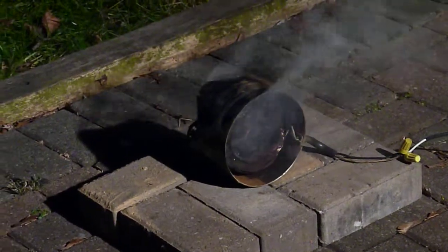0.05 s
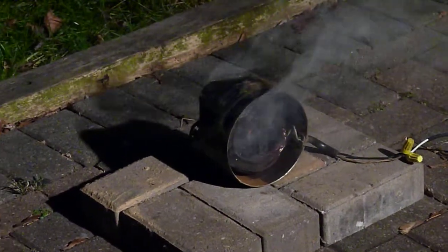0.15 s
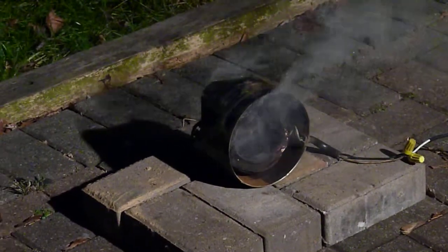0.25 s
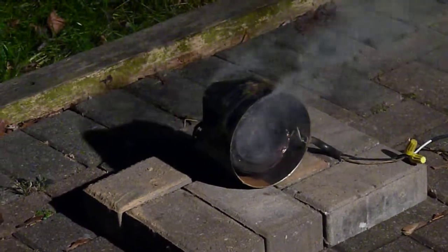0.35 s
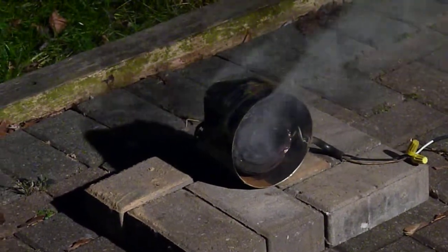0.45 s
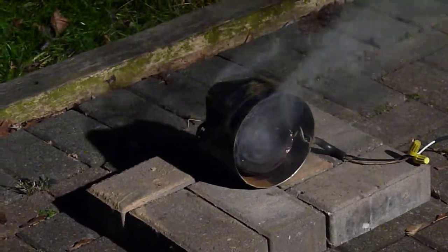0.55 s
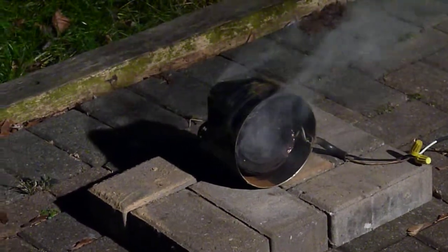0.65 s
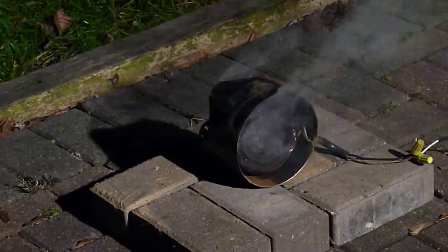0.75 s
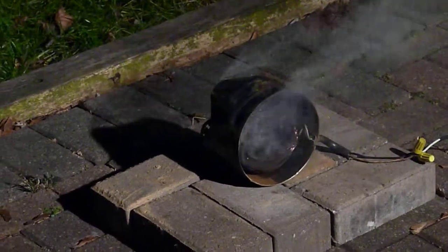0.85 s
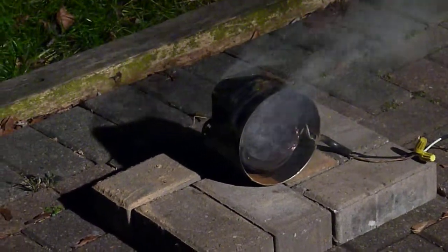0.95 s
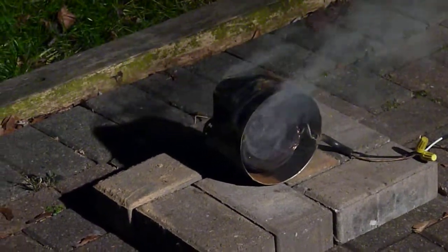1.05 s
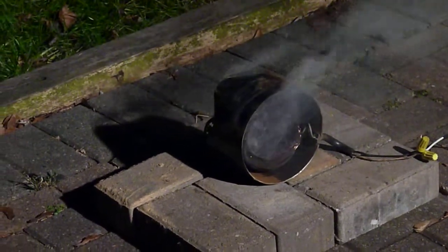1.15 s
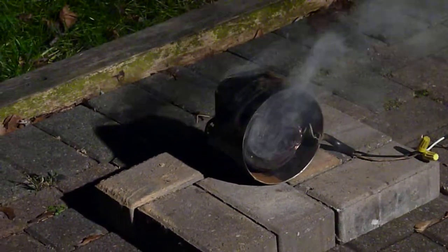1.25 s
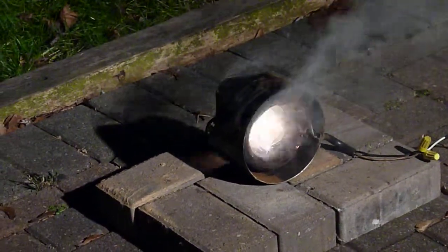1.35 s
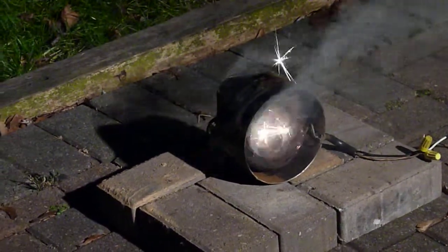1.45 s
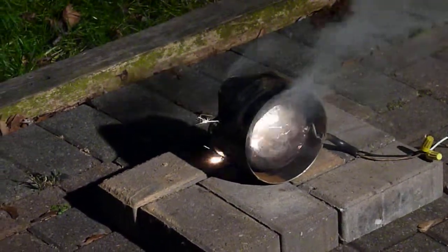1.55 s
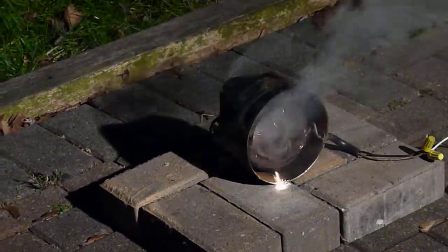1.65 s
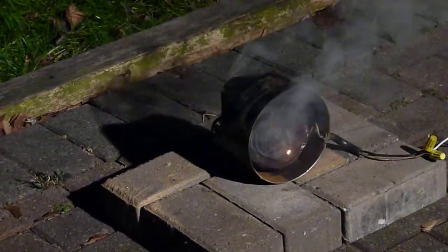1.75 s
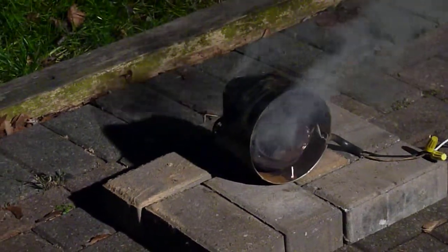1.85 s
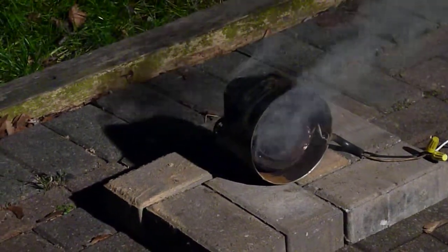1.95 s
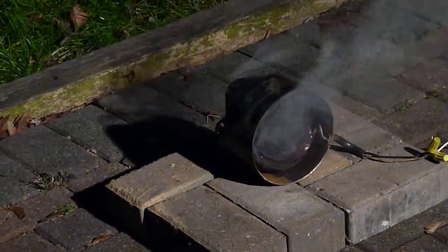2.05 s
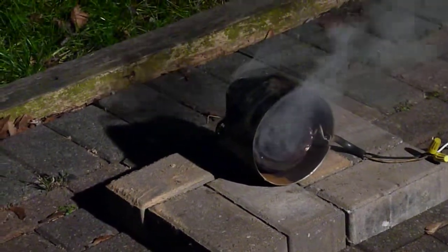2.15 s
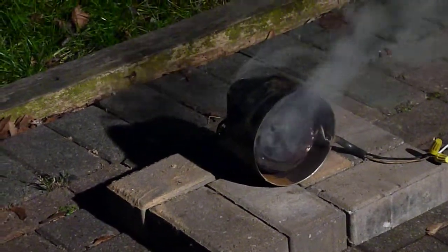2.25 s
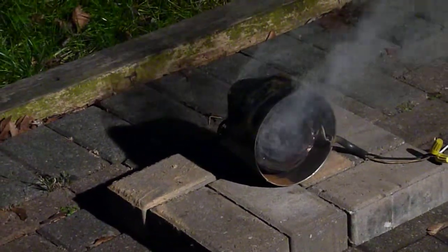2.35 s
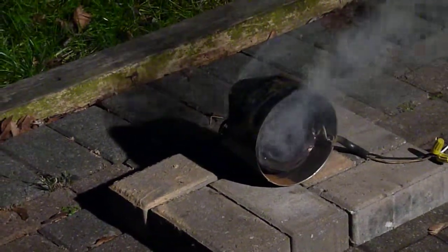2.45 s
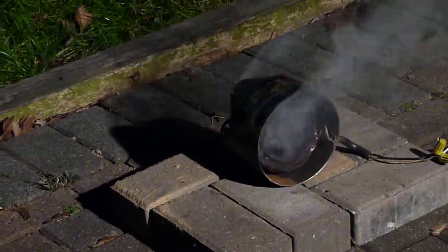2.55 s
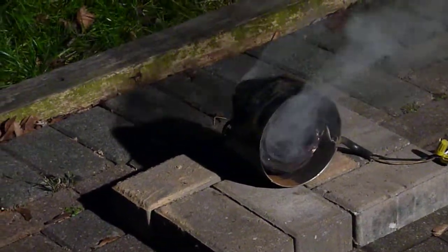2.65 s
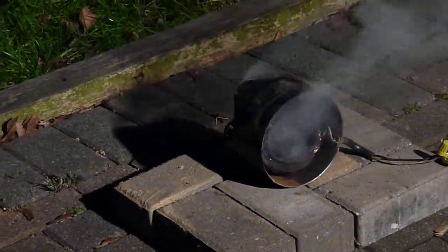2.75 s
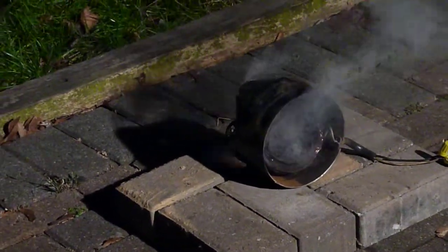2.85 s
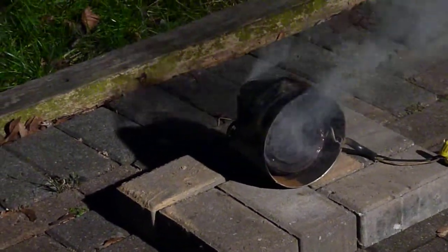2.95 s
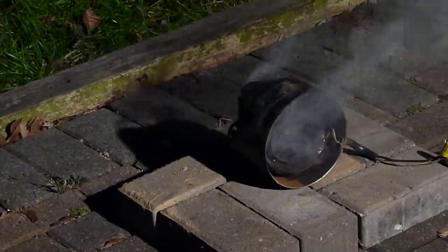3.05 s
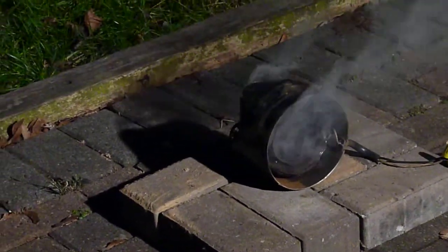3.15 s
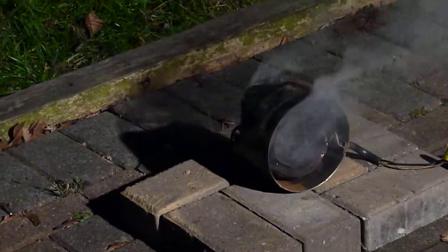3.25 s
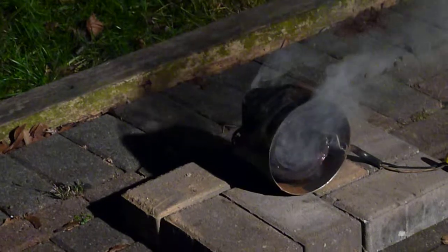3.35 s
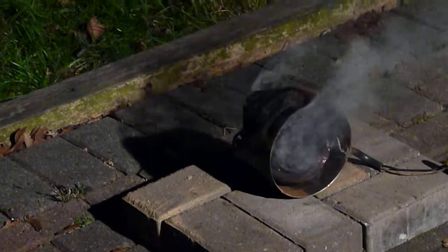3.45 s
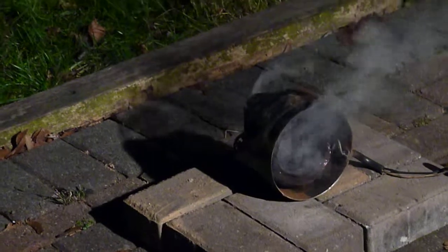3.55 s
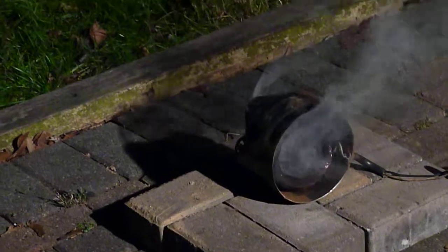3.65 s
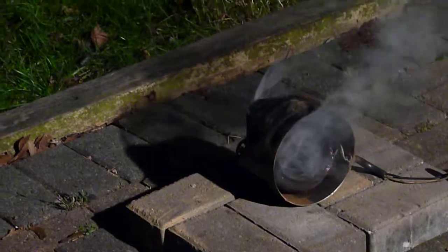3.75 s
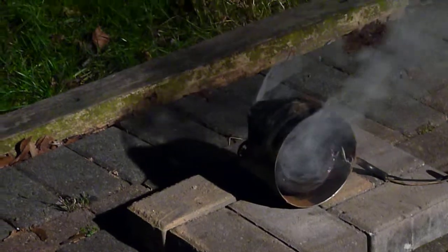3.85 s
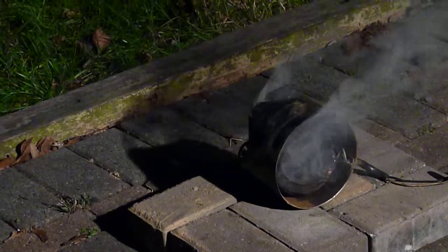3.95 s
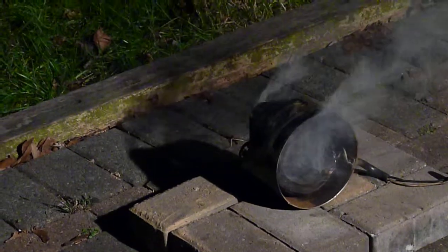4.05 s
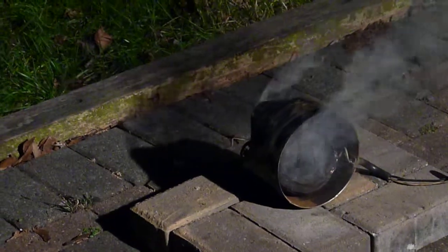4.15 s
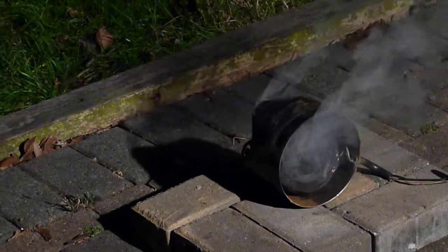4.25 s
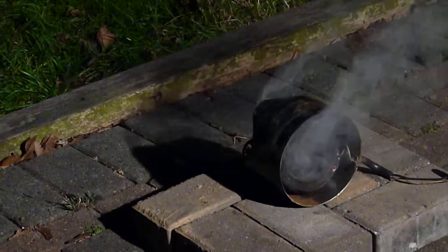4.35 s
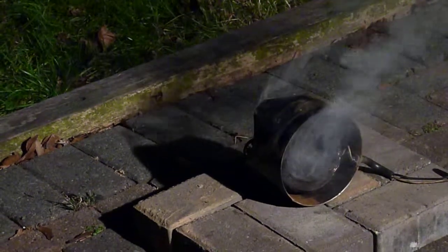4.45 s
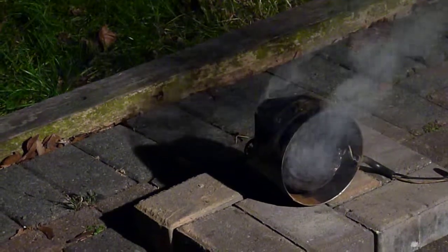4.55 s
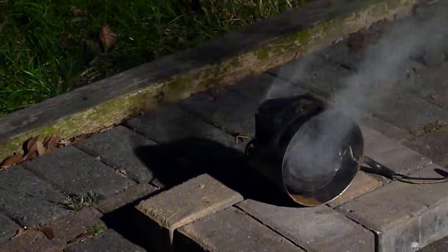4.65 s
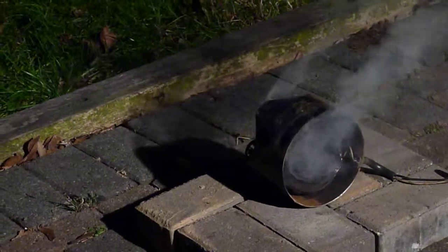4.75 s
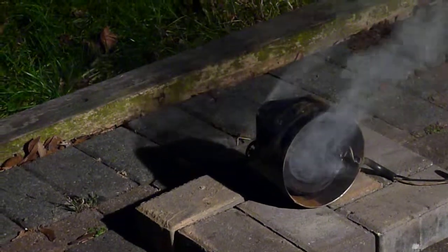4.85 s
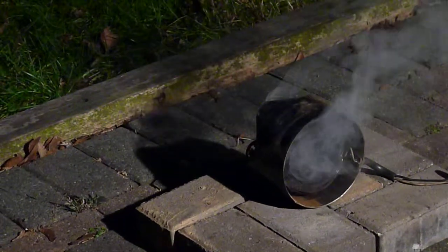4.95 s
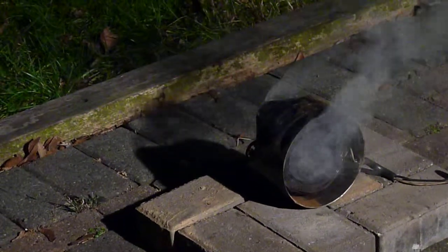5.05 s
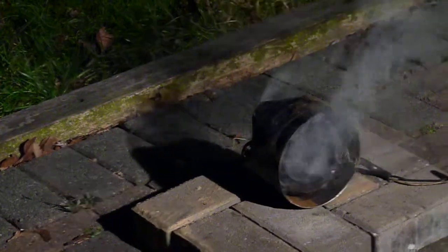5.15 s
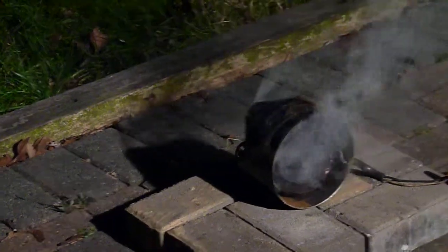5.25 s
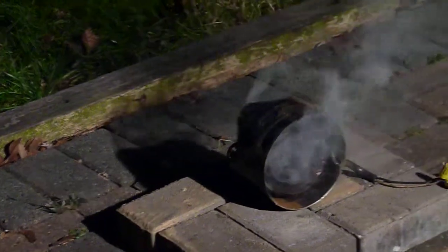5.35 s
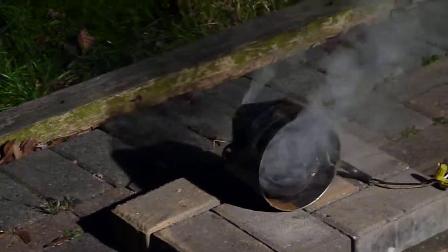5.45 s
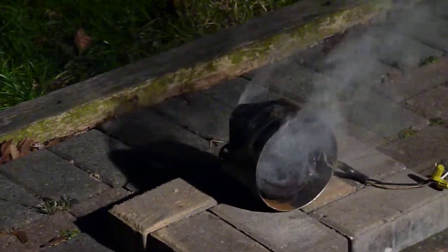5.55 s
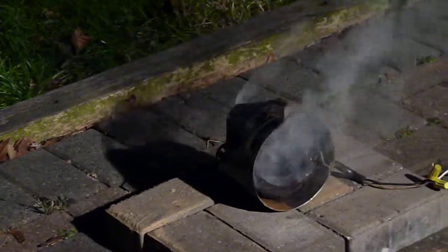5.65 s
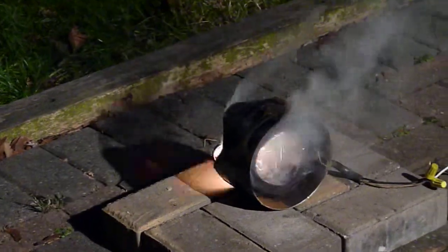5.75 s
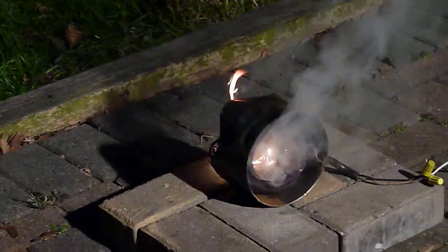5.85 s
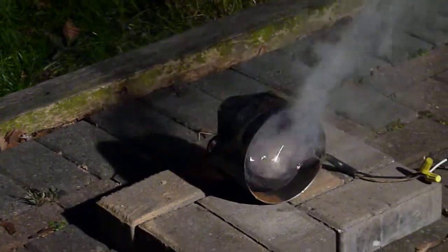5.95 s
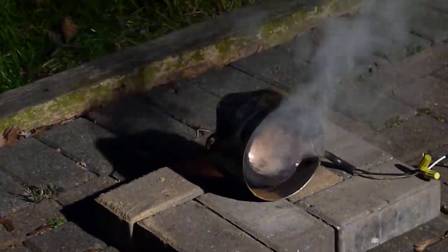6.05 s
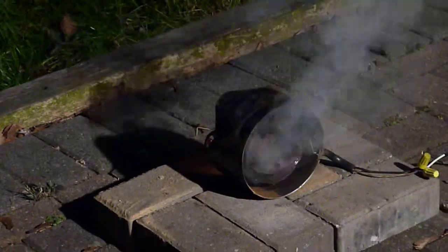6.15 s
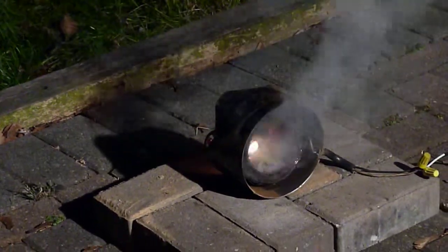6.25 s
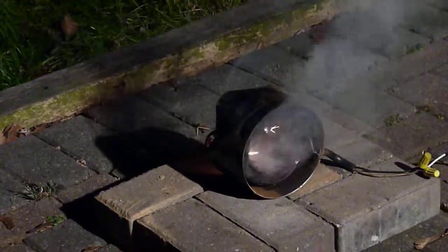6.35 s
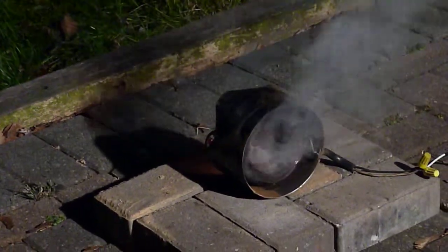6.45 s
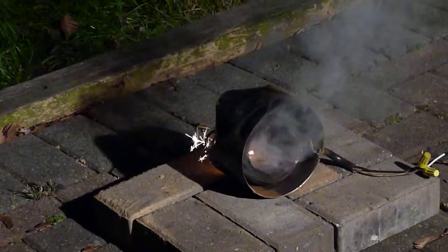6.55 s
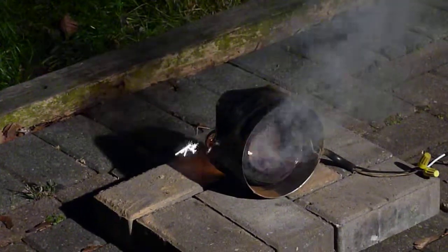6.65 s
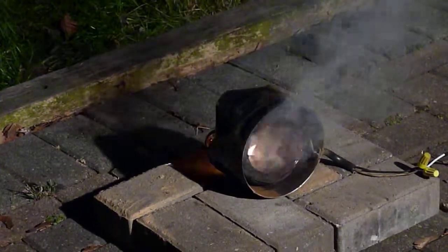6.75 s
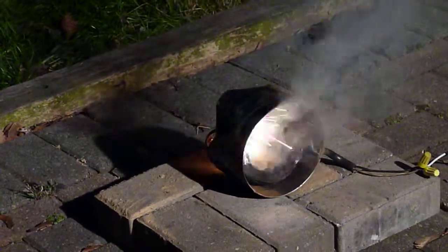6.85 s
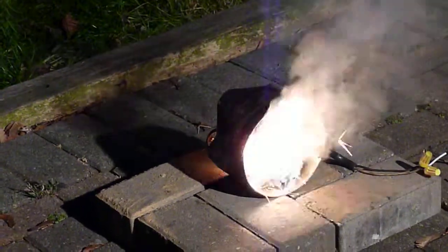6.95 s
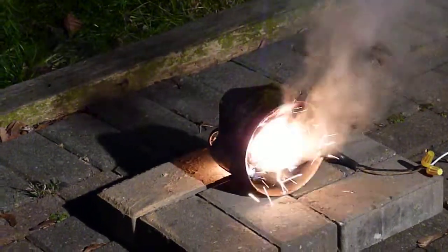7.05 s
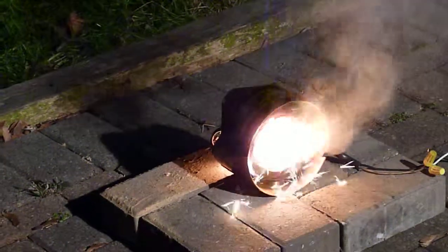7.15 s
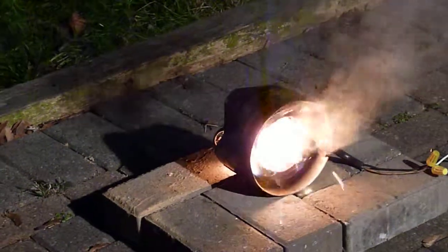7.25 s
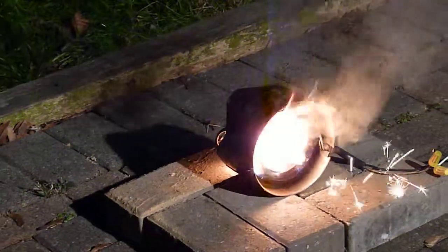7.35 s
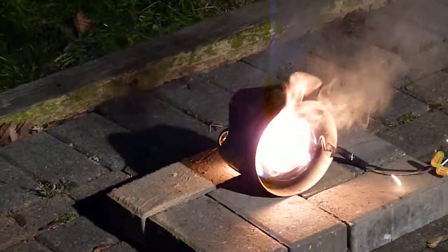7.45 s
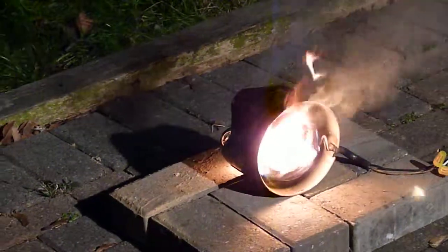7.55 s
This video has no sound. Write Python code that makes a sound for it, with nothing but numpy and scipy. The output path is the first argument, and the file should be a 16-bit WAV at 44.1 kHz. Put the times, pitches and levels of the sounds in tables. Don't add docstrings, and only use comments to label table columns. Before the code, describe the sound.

Outdoors on paving, a smoking motor coil in a metal housing gives a steady, raspy mains buzz with fine sizzling and ticks. Snaps briefly choke the buzz, and it stops near three seconds. Sparse crackles and metallic cracks continue over a soft distant traffic roar, until a sputtering arc and low whoosh ignite it, leaving faint hum and sizzle. Fairly close stereo microphone, dull top end, slight reflections from brick.

```python
import sys
import numpy as np
from scipy import signal
from scipy.fft import rfft, irfft, next_fast_len
from scipy.io import wavfile
from scipy.ndimage import uniform_filter1d, map_coordinates

SR = 44100
rng = np.random.default_rng(int(sys.argv[2]) if len(sys.argv) > 2 else 0)


def unload_audio(sound):
    columns = np.transpose(np.atleast_2d(sound))
    steps = np.round(np.clip(columns, -1, 1) * 32767)
    wavfile.write(sys.argv[1], SR, steps.astype(np.int16))


def level_to_linear(level):
    exponent = np.asarray(level, float) / 20
    return 10 ** exponent


N = 335601
T = np.arange(N) / SR

# (frequency [Hz], level [dB])
ROAR_COLOUR = [(25, -69), (100, -26.5), (204, -8.5), (355, -4.5), (447, -10.5), (778, 2), (2100, -12),
               (3120, -47)]
# (frequency [Hz], side under mid [dB])
ROAR_SIDE = [(60, -26), (130, -35), (250, -28), (540, -19), (940, -16), (1620, -9), (2810, -4), (4870, -1),
             (8430, 0)]
# (frequency [Hz], left-right [dB])
ROAR_LEAN = [ (310, 0.0), (540, -0.5), (940, -1.5), (1620, -3.0), (2810, -5.0), (4870, -1.5)]
# (time [s], level [dB], extra tyre hiss [dB])
TRAFFIC = [(0, -46, -3.5), (1.1, -45, -2), (1.7, -45, 0.5), (2.9, -44.5, -1.2), (3.5, -45.5, 2),
           (4, -45, -0.5), (4.9, -44, -5), (5.3, -45.5, -0.5), (5.8, -45, 0), (6.2, -45.5, -5.5),
           (6.8, -46, -5), (7.61, -45, -7)]
# (frequency [Hz], level [dB])
TYRES = [(1000, -40), (1500, -8), (2100, 0)]
# (frequency [Hz], level [dB])
HISS_COLOUR = [(1000, -19.5), (2500, -2.5), (3200, -0.5), (4500, -6), (7000, -7), (8000, -14.5),
               (8800, -19.5), (9300, -40.5)]
HISS_DB = -66
# (frequency [Hz], level [dB])
FAR_HUM = [(150.5, -67.5), (360.1, -65)]

BUZZ_HZ, BUZZ_START_S = 120.04, .0071
# (time [s], level [dB], looseness of the core on upper partials [dB])
PULL = [
    [(0, -40, -2.5), (.5, -38.5, -1), (1.35, -38.5, -0.1), (1.45, -41.5, -3), (1.7, -40, -1),
     (2.1, -40, -1.5), (2.9, -39, 0)],
    [(7.08, -64, 7), (7.3, -58, 5), (7.4, -52, 2.5), (7.61, -55, 4.5)],
]
# (multiple [1], level [dB])
PARTIALS = [(1, -27.5), (2, -12.5), (3, -7.5), (4, -19), (5, -9.5), (6, -1), (7, -6.5), (8, -10.5), (9, -4),
            (10, 1), (11, -3.5), (12, -9.5), (13, -11.5), (14, -14.5), (15, -14.5), (16, -27), (17, -16.5),
            (18, -13), (19, -12), (20, -18.5), (21, -30), (22, -30), (23, -37), (24, -28), (25, -26),
            (26, -31), (27, -31), (28, -33.5), (29, -36), (30, -42), (31, -38), (32, -31), (33, -30.5),
            (34, -43), (35, -34), (36, -43), (37, -44.5), (38, -45), (39, -42), (40, -35.5), (41, -38.5),
            (42, -44), (43, -40.5), (44, -35), (45, -42), (46, -35.5), (47, -36.5), (48, -39.5),
            (49, -36.5), (50, -34.5), (51, -38), (52, -35.5), (53, -38)]
# (frequency [Hz], level [dB])
RATTLE = [(3480, -36.5), (3720, -43), (3960, -30.5), (4300, -39.5), (4850, -33.5), (5950, -33.5),
          (6800, -44), (8800, -50.5)]
# (frequency [Hz], width [Hz])
PARTS = [(480, 44), (840, 44), (960, 44), (1700, 100), (2380, 140), (2950, 140), (3420, 170), (3960, 300),
         (4870, 160), (6000, 150)]
# (level on each part [dB], ...)
STATES_OF_COIL = [(-4, -6, 6, -6, -5, -22, -2, -8, 5, 9), (-9, 0, 10, -12, -1, 2, -2, -4, 1, 2),
                  (-5, 1, 7, -6, 0, -1, 3, 0, -1, 0), (0, 2, 7, -4, -3, 2, 6, 0, -2, 2),
                  (8, 3, 0, -3, -3, -5, -10, -12, -5, -8), (4, 5, 4, -1, -5, -17, 0, -4, 2, -3),
                  (0, 0, 2, -1, -20, -1, 0, -4, 0, -4), (8, 1, 2, 1.5, 2, 1.5, -1, 1, 9, -2),
                  (5, 1, -6, 1.5, 2, 1.5, 0, 0, 10, 3), (0, 0, 0, 0, 2, 0, 2, -1, 0, 0)]
TAKES_OVER_S = [-1, .25, .7, 1.07, 1.4, 1.62, 1.82, 2.12, 2.5, 4]
# (multiple [1], level [dB])
RELIT = [(2, -1), (3, 6), (4, -9), (5, -3.5), (6, -4.5), (7, 1), (8, -10), (9, -1), (10, -8), (12, -4),
         (13, -5.5), (15, -12), (17, -7), (18, -10.5), (19, -13), (20, -14), (23, -26), (25, -23),
         (27, -23), (28, -20), (29, -22.5)]
RELIT_REST_DB, RELIT_SAG_HZ = -20.5, .19
AGEING_DB_PER_S, AGEING_ABOVE_HZ = 1.1, 4000
SLAP_HZ, SLAP_LEAD_S_PER_HZ = 1750, .57e-6
# (time [s], depth [dB], recovery [s])
SHORTS = [
    (1.028, 19, 0.029),
    (1.357, 33, 0.02),
    (1.407, 16, 0.023),
    (1.604, 10, 0.027),
]
# (frequency [Hz], left-right phase [rad])
HUM_LEAD = [(1800, .1), (2400, 0), (2880, 1.2), (3120, 1), (3240, -1.2), (3480, 0), (3840, -2.3), (3960, 0)]
# (frequency [Hz], left-right [dB])
HUM_LEAN = [(600, -.3), (1800, -1.5), (2040, -5), (2160, 3), (2400, -4), (2880, 8), (3400, -2), (4500, -3)]

# (frequency [Hz], level [dB])
CRACK_COLOUR = [(300, -41), (1500, -4), (3200, -6), (7000, 1), (8000, -13.5), (9500, -50)]
# (frequency [Hz], width [Hz], level [dB])
HOUSING = [(2200, 350, -1), (3300, 320, 0), (4030, 99, -3), (5460, 150, -7), (5540, 93, -9),
           (6500, 170, -11), (7000, 130, -5), (7460, 190, -16.5), (8300, 200, -28)]
# (frequency [Hz], width [Hz], level [dB])
COIL_FORMER = [(4090, 170, 1), (5460, 510, -0.5), (6050, 250, 1.5), (6950, 570, -0.5), (8600, 360, -17)]
# (frequency [Hz], level [dB])
SIZZLE_COLOUR = [(2200, -21.5), (3100, -13.5), (4000, -8), (5000, 0), (5700, -5.5), (7000, -6),
                 (8000, -4.5), (9200, -25)]
BOIL_DB, HEATING_DB_PER_S, COOL_S = -69, 1.64, 0.23
SMOULDER_DB, FLAME_S, FLAME_DB = -76, 7.03, -66

# (time [s], peak level [dB])
TICKS = [(0.3366, -48.5), (0.395, -50.5), (1.2695, -50), (1.3034, -52), (1.3488, -40.5), (1.4012, -40),
         (1.5993, -29.5), (1.7858, -50), (2.0787, -49), (2.1525, -51), (2.2643, -48), (2.3221, -50),
         (2.4124, -50), (2.4942, -47), (2.5735, -48.5), (2.6908, -50), (2.802, -47), (2.8195, -51),
         (3.0944, -50.5), (3.1453, -47.5), (3.2026, -53), (3.4042, -50), (3.902, -50.5), (4.117, -48),
         (4.2941, -49), (5.7843, -30), (5.8097, -43), (5.8326, -49), (6.1833, -52), (6.6014, -53),
         (.327, -52), (.43, -57), (.5535, -58), (.6782, -57), (.7037, -59), (.778, -57), (1.0035, -56),
         (1.2031, -55), (1.228, -57), (1.3362, -50), (1.7199, -52), (1.8531, -56), (1.9109, -54),
         (1.9778, -57), (2.1364, -54), (2.2192, -55), (2.2447, -53), (2.3824, -52), (2.5305, -52),
         (2.6188, -54), (2.7191, -53), (2.8523, -51), (2.8772, -55)]
TICK_HZ, TICK_WIDTH_HZ = 4990, 310
FAINT_TICK_DB, FAINT_SPREAD_DB, FAINT_COOL_DB = -58, 4, -7
# (time [s],
# peak level [dB], pitch [Hz])
KNOCKS = [(1.601, -25.5, 1170), (1.6, -32.5, 2200), (1.603, -33, 1160), (1.401, -33, 910),
          (2.9, -31.5, 2200), (4.098, -35, 980), (4.098, -35.5, 2950), (5.456, -32, 890),
          (5.784, -23.5, 970), (5.794, -39, 3470), (6.225, -34, 800), (6.864, -33.5, 860),
          (6.909, -28.5, 2050), (5.7845, -34, 420), (5.804, -46, 3500), (5.811, -49, 3650),
          (5.817, -49, 3400), (5.852, -50, 3400), (5.877, -50, 3600), (6.9005, -38, 2930),
          (6.927, -32, 3150), (6.942, -33, 3400), (6.961, -36, 3400), (6.975, -36, 1900),
          (6.992, -33, 3300), (7.01, -32, 2160), (7.18, -53, 3100), (7.231, -54, 3000), (7.283, -49, 3300),
          (1.626, -42, 6300), (.358, -57, 7200), (1.352, -41, 3370), (1.402, -40.5, 3500),
          (1.402, -37, 6070), (1.602, -33, 4150), (1.601, -31, 7300), (1.638, -47, 6500),
          (2.901, -39.5, 7440), (4.108, -44, 3400), (4.124, -46, 6160), (4.099, -40, 2100),
          (2.98, -52, 5000), (6.055, -55, 5600), (6.135, -54, 5600), (6.163, -53, 5050), (6.21, -54, 5000),
          (6.335, -55, 5600), (6.43, -54, 5600), (6.382, -41, 3400), (6.186, -46, 4200), (5.727, -51, 6000),
          (5.727, -52, 7100), (1.026, -51, 7000), (1.316, -53, 4000), (1.316, -54, 6600),
          (5.462, -55, 5600), (2.763, -52, 6300), (1.558, -52, 4100), (2.938, -52, 3700),
          (6.956, -37, 300), (7.007, -37, 300), (6.967, -40, 480), (5.868, -43, 2900), (5.868, -41, 2100),
         (6.382, -45, 2100), (6.601, -43, 2100), (5.622, -48, 2900), (5.785, -38, 2200), (1.6, -33, 5000),
         (2.901, -42, 6900), (4.295, -50, 7000)]

# (time [s], peak level [dB], strongest ring [Hz], share of that ring [0-1], length [s])
SNAPS = [(1.046, -48, 3910, 0.2, 0.0034), (1.351, -33, 6990, 0, 0.0017),
         (1.4006, -31.5, 5200, 0.36, 0.0021), (1.6003, -24.5, 6270, 0.55, 0.0058),
         (2.9003, -35.5, 5700, 0.65, 0.0025), (4.0978, -24, 4650, 0.6, 0.0014),
         (4.294, -43, 3900, 0.4, 0.0033), (5.615, -45, 5600, 0.2, 0.0047),
         (5.784, -29.5, 6730, 0.2, 0.0057), (5.81, -44, 4830, 0.5, 0.0027), (5.832, -31, 5630, 0.2, 0.0045),
         (5.867, -34.5, 6090, 0.2, 0.0041), (6.184, -40, 7250, 0.2, 0.0054),
         (6.377, -41.5, 6700, 0.1, 0.0035), (6.3814, -34, 5600, 0.2, 0.0049),
         (6.6, -37.5, 7170, 0.2, 0.0055)]
# (time [s], peak level [dB], ring [Hz], share [0-1], length [s])
LEADERS = [
    (1.592, -39, 5250, .3, .005),
    (5.7765, -48, 6770, .3, .004),
]
# (time [s], peak level [dB], strongest ring [Hz])
CRACKLES = [(1.087, -50, 3000), (1.301, -48, 3960), (1.458, -50, 6050), (1.559, -52, 4090),
            (2.91, -42, 6800), (2.821, -49, 4900), (2.854, -51, 5700), (2.846, -51, 5900),
            (2.83, -53, 5800), (2.864, -54, 6500), (2.938, -52, 5200), (2.875, -55, 4090),
            (2.924, -43.5, 5820), (3.245, -54, 3380), (4.1214, -42.5, 3900), (4.583, -53.5, 3320),
            (4.814, -57, 3940), (5.622, -43, 5600), (5.63, -45, 3450), (5.646, -50, 6340),
            (5.716, -51, 6870), (5.745, -52, 3150), (5.896, -48, 3660), (6.011, -46.5, 4090),
            (6.53, -48.5, 6860), (6.587, -47, 5460), (6.7371, -51, 6360), (6.759, -55, 7150),
            (7.145, -46, 6350), (7.18, -48, 6900), (7.23, -49, 3130), (7.282, -48, 3400),
            (7.3562, -48, 3040), (7.407, -48, 3590)]
CRACKLE_SHARE, CRACKLE_S = .35, 0.0037

# (time [s], level [dB])
ARC = [
    (6.897, -53),
    (6.909, -41),
    (6.93, -46),
    (6.96, -39),
    (6.995, -38.5),
    (7.012, -39),
    (7.026, -52),
]
# (time [s], level [dB])
WHOOSH = [
    (6.9, -86),
    (6.922, -78),
    (6.954, -44.5),
    (7.016, -51),
    (7.062, -68),
    (7.1, -59),
]

# (frequency [Hz], left-right [dB])
PORT_LEAN = [(300, 0), (1000, -.8), (2000, -2.8), (3300, -1.5), (4000, 0), (5500, -2), (7500, -6),
             (8800, -5)]
# (frequency [Hz], left-right phase [rad])
PORT_LEAD = [(1200, 0), (3300, .7), (4200, -.1), (5600, -.6), (6100, -1.3), (7500, -1), (8600, .4)]
# (frequency [Hz], width [Hz])
NOTCHES = [(2595, 340), (4600, 600), (5428, 270), (7905, 190), (8120, 150)]
NOTCH_ON_S = .025

CURRENT_OFF_S, ARC_STRIKES_S = PULL[0][-1][0], ARC[0][0]


def evened(x):
    return x / np.sqrt(np.mean(x ** 2) + 1e-20)


def peaked(x):
    return x / abs(x).max()


def add(mix, s, sound):
    part = mix[round(s * SR):][:len(sound)]
    part += sound


def read(points, hz):
    f, value = np.transpose(points)
    return np.interp(np.log(hz + 1), np.log(f + 1), value)


def level(rows, edge):
    s, db = np.transpose(rows)
    inside = np.minimum(T - s[0], s[-1] - T)
    return level_to_linear(np.interp(T, s, db)) * np.clip(inside / edge + 1, 0, 1)


def colour(x, points):
    n = x.shape[-1]
    size = next_fast_len(n)
    gain = level_to_linear(read(points, np.fft.rfftfreq(size, 1 / SR)))
    return irfft(rfft(x, size) * gain, size)[..., :n]


def wash(colour_points, patchy_db):
    frames, hz = N // 256 + 5, np.fft.rfftfreq(1024, 1 / SR)
    a, b, c, d, patches = rng.standard_normal((frames, 513, 5)).T
    patches = uniform_filter1d(patches, 10, 0)
    patches = evened(uniform_filter1d(patches, 16, 1))
    mid = a + 1j * b
    side = level_to_linear(read(ROAR_SIDE, hz))[:, None] * (c + 1j * d)
    z = np.array([mid + side, mid - side])
    lean_db = read(ROAR_LEAN, hz)[:, None] * np.array([.5, -.5])[:, None, None]
    z *= level_to_linear(read(colour_points, hz)[:, None] + lean_db + patchy_db * patches)
    return evened(signal.istft(z, nperseg=1024, noverlap=768)[1][:, :N])


def town():
    roar = wash(ROAR_COLOUR, 0.71)
    s, _, hiss_db = np.transpose(TRAFFIC)
    tyres = (level_to_linear(np.interp(T, s, hiss_db)) - 1) * colour(roar, TYRES)
    return (roar + tyres) * level(np.array(TRAFFIC)[:, :2], .01)


def night():
    wander = uniform_filter1d(rng.standard_normal(N), 9000)
    drift = 2 * np.pi * np.cumsum(wander) * 0.00383
    hum = sum(level_to_linear(db) * np.sin(2 * np.pi * hz * T + drift) for hz, db in FAR_HUM)
    return town() + level_to_linear(HISS_DB) * wash(HISS_COLOUR, 1.9) + hum


def coil_harmonics(start, part_db, scatter_db):
    order = np.arange(1, len(scatter_db) + 1)
    hz = order * BUZZ_HZ
    db = read(RATTLE, hz) + scatter_db
    db[:len(PARTIALS)] = np.transpose(PARTIALS)[1]
    for gain, (centre, width) in zip(part_db, PARTS):
        db += gain * np.exp(-((hz - centre) / width) ** 2)
    db += AGEING_DB_PER_S * start * (hz > AGEING_ABOVE_HZ)
    if start > CURRENT_OFF_S:
        db = np.minimum(db + 11.5, RELIT_REST_DB - order / 6.4)
        multiple, relit_db = np.transpose(RELIT)
        db[multiple.astype(int) - 1] = relit_db
    return db


def buzz():
    bins, harmonics = np.arange(257), 72
    scatter_db = rng.standard_normal((7, harmonics))
    loose_phase = rng.standard_normal(len(bins))
    edges, out = np.r_[TAKES_OVER_S, 9], np.zeros(N)
    turns = (T - BUZZ_START_S) * BUZZ_HZ - RELIT_SAG_HZ * np.maximum(T - ARC_STRIKES_S, 0)
    at = turns % 1 * 512
    s, _, loose_db = np.vstack(PULL).T
    loose = level_to_linear(np.interp(T, s, loose_db))
    late = np.exp(-2j * np.pi * bins * BUZZ_HZ * .0016)
    thin = bins > 13
    rebound = np.where(thin, 1, -(.93 + late) / (1 + .93 * late))
    slap = np.pi * SLAP_LEAD_S_PER_HZ * (bins * BUZZ_HZ - SLAP_HZ) ** 2
    for k, (start, part_db) in enumerate(zip(TAKES_OVER_S, STATES_OF_COIL)):
        end = edges[k + 1]
        now = (T > start) & (T < end + .05)
        db = coil_harmonics(start, part_db, scatter_db[k % len(scatter_db)])
        log_gain = np.log(level_to_linear(np.r_[db[0] - 12, db, np.full(184, db[-1])]))
        phase = -signal.hilbert(np.r_[log_gain, log_gain[-2:0:-1]]).imag[:257]
        phase = np.where(thin, slap, phase)
        phase += np.where(bins > 30, 1.2, 0.45 * thin) * loose_phase
        lines = np.exp(log_gain + 1j * phase) * rebound * (bins <= harmonics)
        lines /= np.sqrt(np.mean(irfft(lines) ** 2))
        body, upper, rattle = (
            map_coordinates(irfft(lines * band), [at[now]], order=3, mode="grid-wrap")
            for band in (bins <= 16, (bins > 16) & (bins <= 21), bins > 21))
        share = np.clip((T - start) / .04, 0, 1) - np.clip((T - end) / .04, 0, 1)
        out[now] += share[now] * (body + loose[now] * upper + loose[now] ** 1.8 * rattle)
    lost_db = sum(db * (T > s) * np.exp(-np.maximum(T - s, 0) ** 2 / back ** 2) for s, db, back in SHORTS)
    wobble_db = .3 * evened(uniform_filter1d(rng.standard_normal(N), 500))
    pull = sum(level(np.array(rows)[:, :2], 0.016) for rows in PULL)
    return out * level_to_linear(wobble_db - lost_db) * pull


def ring(x, hz, width):
    r = np.exp(-np.pi * width / SR)
    return 2 * signal.lfilter([1 - r], [1, -r * np.exp(2j * np.pi * hz / SR)], x).real


def housing(x, shell_db, modes=HOUSING):
    shell = sum(level_to_linear(db) * ring(x, hz, width) for hz, width, db in modes)
    return colour(x, CRACK_COLOUR) + level_to_linear(shell_db) * shell


def half_cycles(strike, length, weak_db):
    turns = (T - strike) * BUZZ_HZ
    cycle = np.maximum(turns, 0).astype(int)
    uneven_db = 1.1 * rng.standard_normal(int(T[-1] * BUZZ_HZ) + 2)[cycle]
    since = turns % 1 / BUZZ_HZ / length
    hump = np.e * since * np.exp(-since ** 1.27)
    return hump * level_to_linear(weak_db * (np.floor(turns) % 2) + uneven_db)


def heat():
    boil_db = BOIL_DB + HEATING_DB_PER_S * np.minimum(T, CURRENT_OFF_S)
    settle = np.exp(-np.maximum(T - CURRENT_OFF_S, 0) / COOL_S)
    cooling_db = SMOULDER_DB + (boil_db - SMOULDER_DB) * settle
    lit = np.clip((T - FLAME_S) / 0.041, 0, 1)
    return level_to_linear(cooling_db * (1 - lit) + FLAME_DB * lit)


def sizzle():
    live = 0.45 * ((T < CURRENT_OFF_S) | (T > ARC_STRIKES_S))
    pops = level_to_linear(3.9 * np.minimum(rng.exponential(1, N), 4))
    pops *= rng.random(N) < 2500. / SR
    pops *= rng.standard_normal(N)
    pops *= 1 - live + 1.4 * live * half_cycles(0.0047, .0025, weak_db=-4.0)
    return evened(colour(housing(pops, 1.7), SIZZLE_COLOUR)) * heat()


def faint_ticks(count=36):
    place, size = rng.random((count, 2)).T
    s = 1.9 + (T[-1] - 2.2) * place ** 1.5
    db = FAINT_TICK_DB + FAINT_SPREAD_DB * (2 * size - 1) + FAINT_COOL_DB * (s > CURRENT_OFF_S)
    return list(zip(s, db))


def ticks():
    out, t = np.zeros(N), np.arange(800) / SR
    rows = TICKS + faint_ticks()
    shape = peaked(t * np.exp(-2 * np.pi * TICK_WIDTH_HZ * t))
    for (s, db), detune in zip(rows, rng.uniform(.985, 1.025, len(rows))):
        fizz = evened(colour(rng.standard_normal(len(t)), CRACK_COLOUR))
        tone = np.sin(2 * np.pi * TICK_HZ * detune * t)
        add(out, s, level_to_linear(db + 1.5) * shape * (tone + 0.37 * fizz))
    for s, db, hz in KNOCKS:
        decay = max(0.00059, .45 / hz)
        add(out, s, level_to_linear(db) * peaked(t * np.exp(-t / decay)) * np.sin(2 * np.pi * hz * t))
    return out


def snaps():
    out, t = np.zeros(N), np.arange(-200, 1300) / SR
    rows = LEADERS + SNAPS + [(*row, CRACKLE_SHARE, CRACKLE_S) for row in CRACKLES]
    for (s, db, hz, share, length), noise in zip(rows, rng.standard_normal((len(rows), len(t)))):
        burst = np.sign(noise) * np.exp(-t / 0.0063 - (t / length) ** 4) * np.clip(t / 0.00029, 0, 1)
        favoured = ring(ring(burst, hz, 660.0), hz, 660.0)
        sound = (1 - share) * evened(housing(burst, 6.3, COIL_FORMER)) + share * evened(favoured)
        add(out, s + t[0], level_to_linear(db + 1.0) * peaked(sound))
    return out


def arc():
    sparks = rng.standard_normal(N) * level_to_linear(2.1 * np.minimum(rng.exponential(1, N), 3))
    sparks *= .08 + half_cycles(0.00946, 0.0021, weak_db=-8.5)
    puff = ring(ring(rng.standard_normal(N), 320., 260.), 320., 260.)
    jolt = 0.12 * evened(ring(sparks, 850., 500.))
    strikes = (evened(housing(sparks, 1.7)) + jolt) * level(ARC, .002)
    return strikes + evened(puff) * level(WHOOSH, .02)


def ports(x, lead=PORT_LEAD, lean=PORT_LEAN):
    size = next_fast_len(N)
    hz, side = np.fft.rfftfreq(size, 1 / SR), np.array([[.5], [-.5]])
    response = level_to_linear(side * read(lean, hz)) * np.exp(1j * side * read(lead, hz))
    return irfft(rfft(x, size) * response, size)[:, :N]


def yard(x):
    t = np.arange(9000) / SR
    taps = rng.standard_normal((2, len(t))) * (rng.random((2, len(t))) < .06)
    near = level_to_linear(-60 * t / .15) * np.clip((t - .001) / .015, 0, 1)
    wall = 0.24 * np.exp(-((t - .024) / 0.00066) ** 2)
    taps *= near + wall
    brick_colour = [(300, -29.5), (1500, -13.0), (3000, 4.5), (6500, 4), (9000, -4)]  # (Hz, dB)
    echoes = colour(taps / np.linalg.norm(taps[0]), brick_colour)
    return signal.fftconvolve(x, echoes, axes=1)[:, :N]


def scene():
    small_body = signal.butter(3, 140., "highpass", fs=SR, output="sos")
    hum = signal.sosfilt(small_body, buzz())
    sparks = signal.sosfilt(small_body, snaps() + ticks() + arc() + sizzle())
    direct = ports(hum, HUM_LEAD, HUM_LEAN) + ports(sparks)
    return direct + level_to_linear(-13.5) * yard(sparks[None] + .1 * hum) + night()


def roll_off(x):
    return signal.sosfilt(signal.butter(12, 9030, fs=SR, output="sos"), x)


def record(dry):
    clean = dry
    for hz, width in NOTCHES:
        clean = signal.lfilter(*signal.iirnotch(hz, hz / width, SR), clean)
    mix = np.where(T < NOTCH_ON_S, dry, clean)
    mix = signal.sosfilt(signal.cheby2(10, 50, 9500., fs=SR, output="sos"), mix)
    return roll_off(mix)


dry = scene()
out = record(dry)
unload_audio(out)
```